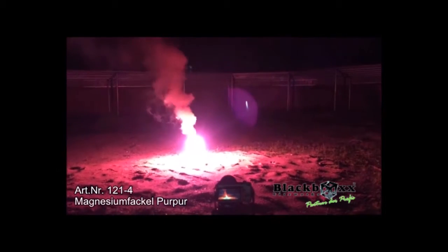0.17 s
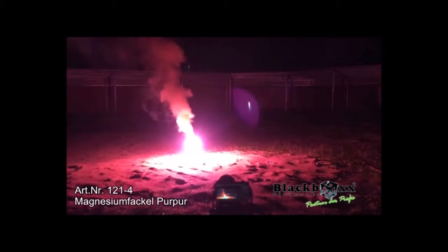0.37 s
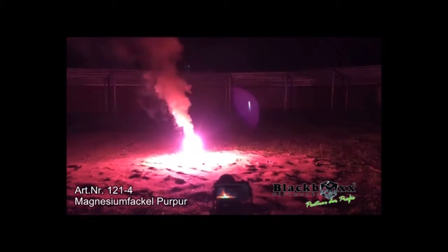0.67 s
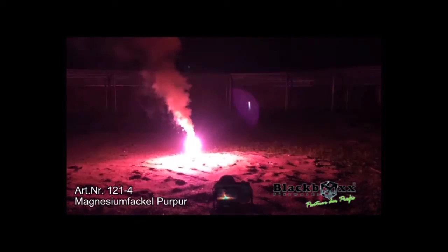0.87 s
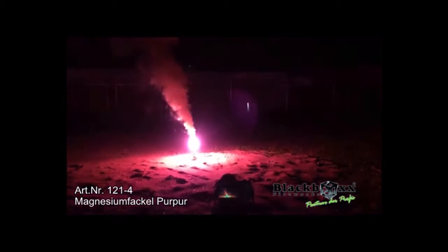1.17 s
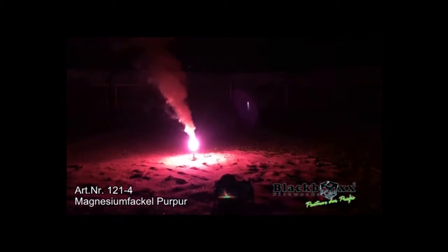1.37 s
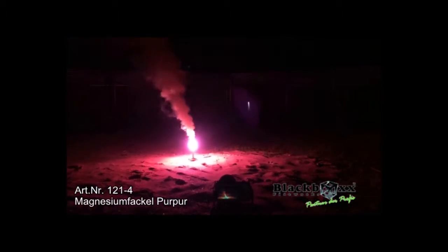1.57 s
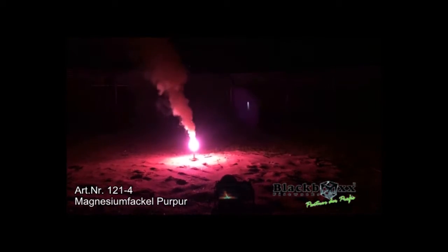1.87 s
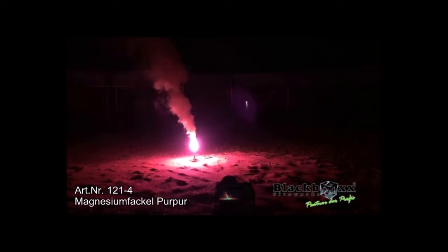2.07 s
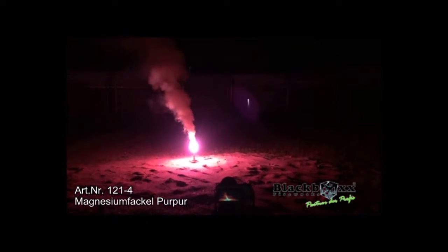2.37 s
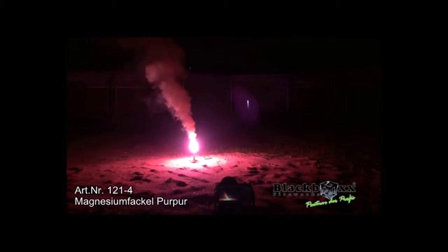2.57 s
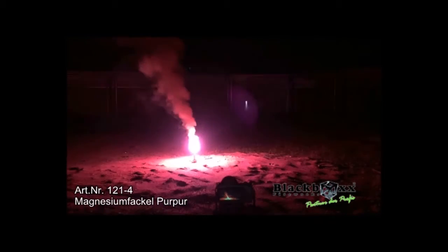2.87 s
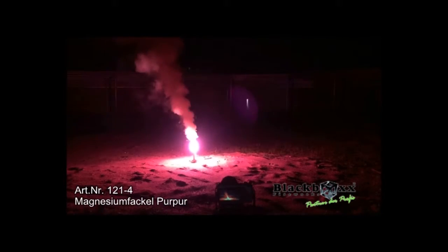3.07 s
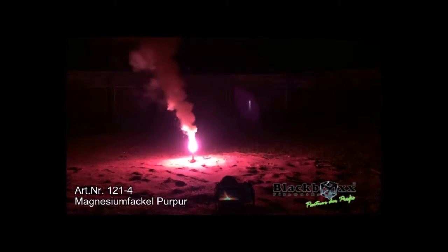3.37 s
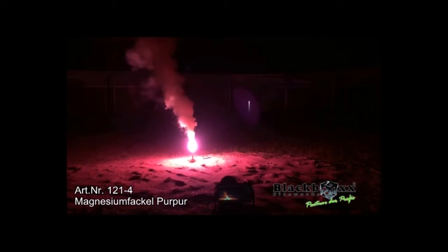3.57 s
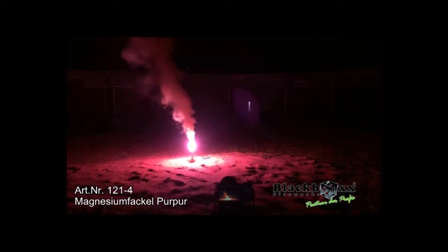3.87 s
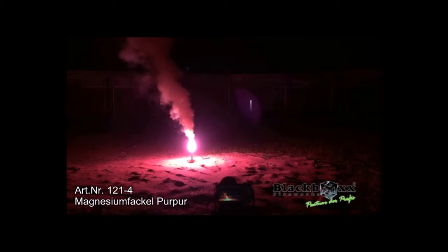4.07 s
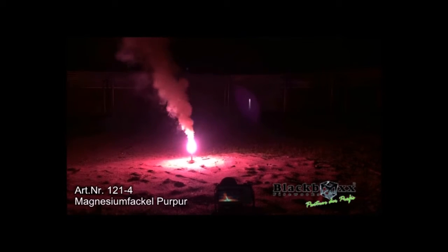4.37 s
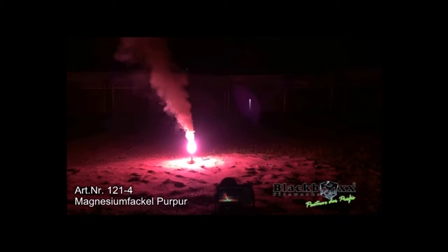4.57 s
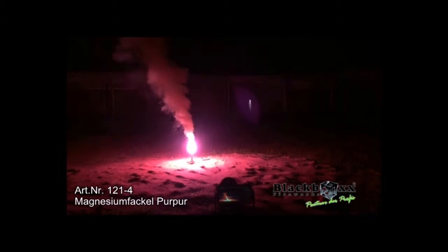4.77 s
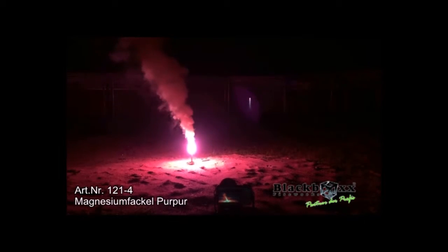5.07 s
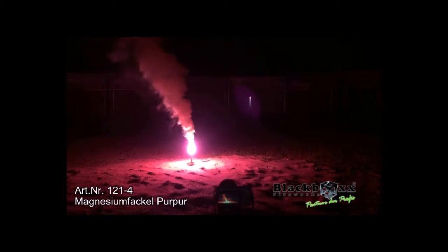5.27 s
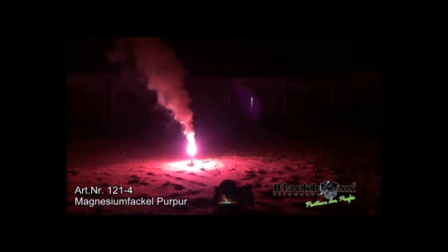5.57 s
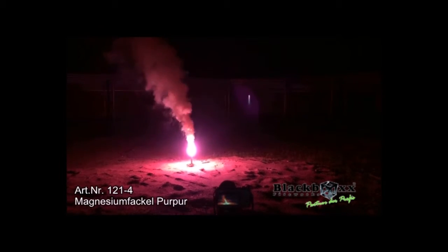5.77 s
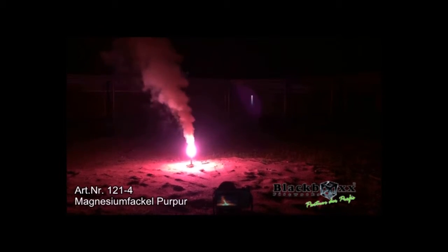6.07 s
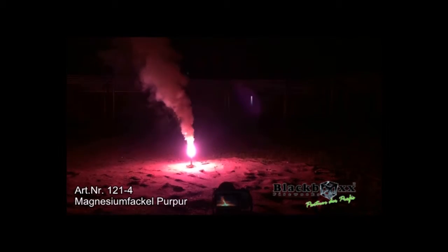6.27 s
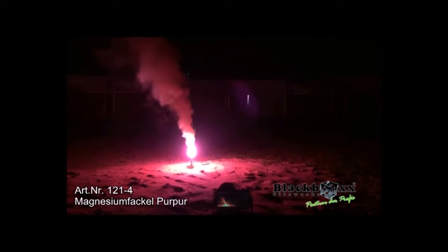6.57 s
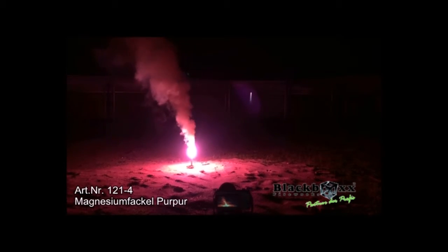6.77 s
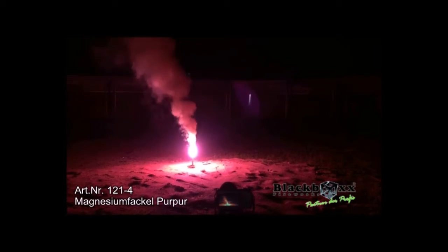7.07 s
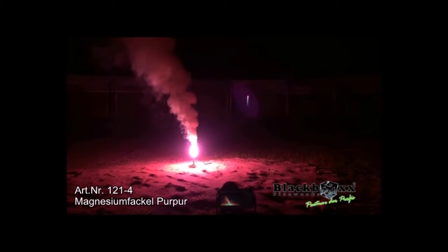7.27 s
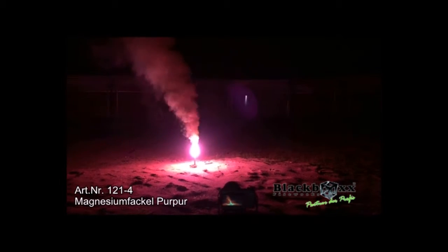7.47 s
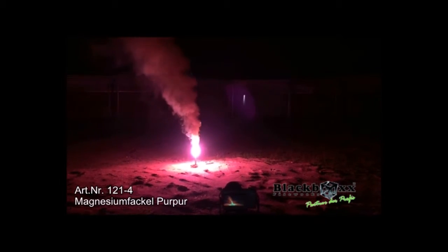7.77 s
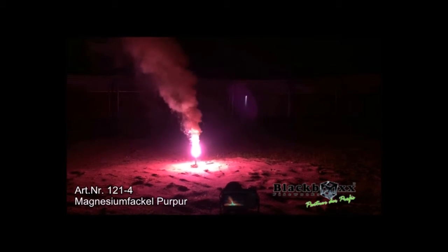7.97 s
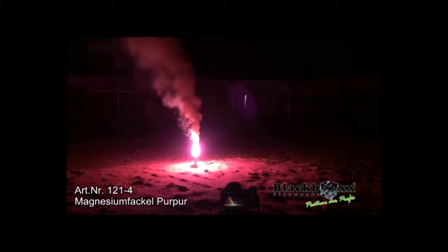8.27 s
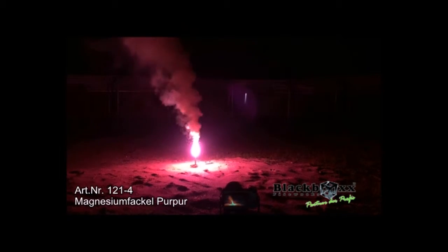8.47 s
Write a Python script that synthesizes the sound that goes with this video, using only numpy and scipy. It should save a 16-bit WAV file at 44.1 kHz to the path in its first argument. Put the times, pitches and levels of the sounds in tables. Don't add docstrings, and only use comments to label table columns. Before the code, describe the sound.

From 0 s a flare stuck in sand is already burning, with a strong continuous jet of bright, breathy hiss. Dense tiny spark clicks give it a fizzing grain, and the top-end sizzle is strongest during the first two seconds. Beneath lies a quieter low flame rumble, rolling in uneven lumps, and a very faint low motor hum. The hissing resonance rises slightly until about 4.5 s. A faint dull pop comes near 2.8 s, a quick cluster of three at 5.0 s as the flame swells, and another at 6.1 s. The rumble caves in briefly around 6.7 s and swells again near 7.6 s. The resonance gradually sinks and the hiss continues to the cut at 8.6 s. Sand reflects closely, fence panels add a faint slap about a tenth of a second late; the sound is centred, with slightly gritty, limited treble.

```python
import sys
import numpy as np
from scipy import signal
from scipy.fft import rfft, irfft, next_fast_len
from scipy.io import wavfile
from scipy.ndimage import uniform_filter1d, minimum_filter1d

SR = 44100
rng = np.random.default_rng(int(sys.argv[2]) if len(sys.argv) > 2 else 0)


def master(y):
    cut = np.clip(np.atleast_2d(y).T, -1, 1)
    pcm = np.round(cut * 32767)
    wavfile.write(sys.argv[1], SR, pcm.astype(np.int16))


def amplitude_ratio(level_db):
    exponent = np.asarray(level_db, float) / 20
    return 10 ** exponent


N = 381024


def rms_one(x):
    return x / np.sqrt(np.mean(x ** 2) + 1e-20)


def in_time(rows):
    s, *columns = np.transpose(rows)
    return [np.interp(np.arange(N) / SR, s, column) for column in columns]


def at_hz(points, hz):
    point_hz, point_db = np.transpose(points)
    return np.interp(np.log(hz), np.log(point_hz), point_db)


def drift(rate_hz):
    r = np.exp(-2 * np.pi * rate_hz * 40 / SR)
    noise = rng.standard_normal(N // 40 + 2002)
    slow = signal.lfilter([1], [1, -2 * r, r * r], noise)[2000:]
    return np.interp(np.arange(N) / 40, np.arange(len(slow)), rms_one(slow))


def filtered(x, response):
    size = next_fast_len(N + SR // 2)
    hz = np.maximum(np.arange(size // 2 + 1) * SR / size, 1)
    return irfft(rfft(x, size) * response(hz), size)[:N]


def bands(spectrum, low_hz, high_hz, count):
    size = next_fast_len(N, True)
    hz = np.maximum(np.arange(size // 2 + 1) * SR / size, 1)
    noise = rfft(rng.standard_normal(size)) * amplitude_ratio(at_hz(spectrum, hz))
    place = np.log(hz / low_hz) / np.log(high_hz / low_hz) * (count - 1)
    place = np.clip(place, 0, count - 1)
    for k, centre_hz in enumerate(np.geomspace(low_hz, high_hz, count)):
        crossfade = np.maximum(1 - np.abs(place - k), 0)
        yield centre_hz, irfft(noise * crossfade, size)[:N]


# frequency in Hz, rms level in dB.
MOTOR = [(98.5, -59.5), (197, -67.5)]


def hum():
    turns = np.cumsum(1 + 0.003 * drift(0.53)) / SR
    tone = 0
    for hz, db in MOTOR:
        tone = tone + np.sqrt(2) * amplitude_ratio(db + 2.3 * drift(2.5)) * np.sin(2 * np.pi * hz * turns)
    return tone


# start in seconds, peak level in dB.
POPS = [
    (2.768, -49),
    (5.005, -48),
    (5.022, -44),
    (5.044, -44),
    (6.066, -46),
]


def pops():
    decay_s = 0.007
    envelope = np.zeros(N)
    for s, db in POPS:
        envelope[round(s * SR)] = amplitude_ratio(db)
    envelope = signal.lfilter([1], [1, -np.exp(-1 / (decay_s * SR))], envelope + 1e-18)

    def dulling(hz):
        low_cut = (hz / 150) / np.sqrt(1 + (hz / 150) ** 2)
        return low_cut / (1 + (hz / 800) ** 3)

    return envelope * rms_one(filtered(rng.standard_normal(N), dulling))


def sparks():
    sparks_per_s, level_db = 600, -54
    sizes = amplitude_ratio(5.0 * np.minimum(rng.exponential(1, N), 4))
    signs = rng.choice([-1, 1], N)
    clicks = sizes * signs * (rng.random(N) < sparks_per_s / SR)
    return amplitude_ratio(level_db) * rms_one(filtered(clicks, lambda hz: amplitude_ratio(at_hz(JET, hz))))


# centre in seconds, change in dB, length in seconds.
SWELLS = [(0.14, 4, 0.073), (0.604, 7, 0.05), (1.16, -4, 0.079), (1.4, 0, 0.083), (2.3, 1.5, .1),
          (2.62, 6, .05), (2.856, 2.5, 0.14), (3.3, -4, 0.098), (3.59, -5, 0.088), (4.025, 5, .1),
          (5.025, 6, 0.18), (5.253, -4, 0.21), (5.72, 4, .05), (5.95, 6, 0.055), (6.19, 5, 0.044),
          (6.716, -9, .06), (7.595, 6, 0.071), (8.29, 1, .08)]


def swells():
    t = np.arange(N) / SR
    return sum(db * np.exp(-0.5 * ((t - s) / (0.5 * length_s)) ** 2) for s, db, length_s in SWELLS)


# frequency in Hz, density in dB per Hz.
RUMBLE = [(20, -37), (50, -3), (85, -1.5), (110, 2.5), (191, -2.5), (343, -14.5), (420, -14.5), (600, -40)]


def rumble(burn_db, swell_db):
    level_db = -50.5 + 0.65 * (burn_db - burn_db.mean())
    deep_hz = 110
    gusts_db = 0.7 * drift(14)
    lumps = 0
    for hz, band in bands(RUMBLE, 44, 290, count=6):
        band_swell_db = swell_db / (1 + (deep_hz / hz) ** 2)
        lumps = lumps + band * amplitude_ratio(gusts_db + band_swell_db + 2.6 * drift(27))
    return amplitude_ratio(level_db) * rms_one(lumps)


# time in seconds, hiss level in dB.
BURN = [(0.0, -37.5), (0.31, -39), (0.67, -38.5), (1.47, -39), (2.02, -38), (3.68, -39), (4.76, -39),
        (4.93, -38), (8.04, -38), (8.08, -39), (8.64, -39)]
BURN_HZ = [2950, 5000, 7540, 11500]
SINK_DB_PER_S = [0.24, 0.2, 0.36, -1.15, -0.02]
FRESH_DB = [1.1, 0, -2.5, -1, 4.5]
# time in seconds, frequency in Hz.
MOUTH = [(0, 5000), (2, 5200), (4.5, 5570), (5.5, 5000), (7, 4700), (8.64, 4200)]
# frequency in Hz, density in dB per Hz.
JET = [(250, -12), (420, -9), (640, -4), (820, -9), (1050, -7), (1500, -7.5), (1850, -5), (2300, -2),
       (3200, 0.5), (4300, 2.5), (6000, 0), (7500, -0.5), (10000, -2), (15300, -8)]


def jet(burn_db, swell_db):
    fresh_s, mouth_width_hz, mouth_boost_db = 2.4, 2700, 6
    mouth_hz, = in_time(MOUTH)
    t = np.arange(N) / SR
    fresh = np.exp(-(t / fresh_s) ** 2)
    curves_db = burn_db + np.outer(SINK_DB_PER_S, t) + np.outer(FRESH_DB, fresh)
    curves_db[0] += 0.25 * swell_db + 0.6 * drift(16)
    curves_db = curves_db - curves_db.mean(axis=1, keepdims=True)
    places = np.log([700.0] + BURN_HZ)
    sputter_db = 0.22 * drift(4.9) + 0.3 * drift(16) + 0.18 * drift(45) + 0.29 * drift(320)
    hiss = 0
    for hz, band in bands(JET, 296, 14470, count=22):
        share = [np.interp(np.log(hz), places, corner) for corner in np.eye(len(places))]
        mouth_db = mouth_boost_db / (1 + (2 * (hz - mouth_hz) / mouth_width_hz) ** 2)
        in_step = np.clip(np.log(hz / 600) / np.log(6.0), 0, 1)
        flicker_db = 0.77 * drift(30)
        hiss = hiss + band * amplitude_ratio(share @ curves_db + mouth_db + in_step * sputter_db + flicker_db)
    return amplitude_ratio(-38.5) * rms_one(hiss)


# delay in seconds, level in dB, dulling corner in Hz.
FENCE = [(.0331, -26, 2500), (.0446, -28, 9000), (.0887, -30, 9000), (.0959, -26, 4000),
         (.1115, -24, 18000), (.11449, -13, 2400), (.1221, -17.5, 7000), (.1945, -24, 2500)]
# delay in seconds, share of the direct sound.
NEARBY = [(.0007, .08), (.0012, .05), (.00172, .04), (.002, .06), (.00228, .05), (.0054, .03)]


def paths(hz):
    sand_s, sand_share, sand_cut_hz = 0.000336, 0.43, 1980

    def delayed(s):
        return np.exp(-2j * np.pi * hz * s)

    sand = sand_share * delayed(sand_s) / (1 + 1j * hz / sand_cut_hz)
    fence = sum(amplitude_ratio(db) * delayed(s) / (1 + 1j * hz / dull_hz) ** 2 for s, db, dull_hz in FENCE)
    nearby = sum(share * delayed(s) for s, share in NEARBY)
    return (1 + sand) * (1 + nearby) + fence


def scene():
    swell_db = swells()
    burn_db, = in_time(BURN)
    flare = filtered(jet(burn_db, swell_db) + sparks(), paths)
    mono = flare + pops() + rumble(burn_db, swell_db) + hum()
    return np.array([mono, mono])


# centre in Hz, width in Hz, gain in dB.
DIPS_AND_PEAKS = [(1320, 170, -7), (1720, 200, -3), (3300, 120, -2), (3750, 200, -3.5), (4150, 200, -1.5),
                  (6380, 150, -6), (6800, 120, -2), (7400, 300, -1.5), (9200, 220, -3), (10300, 300, -2),
                  (13400, 250, -1.5), (14250, 200, 1.0),
                  (2243, 520, 5.5), (8150, 280, 2), (13150, 750, 6.5), (13750, 300, 2.5), (14800, 300, 6),
                   (15250, 200, 1.5)]


def colouring(hz):
    low_cut_hz = 38
    colour_db = 0
    for centre_hz, width_hz, db in DIPS_AND_PEAKS:
        colour_db = colour_db + db / (1 + (2 * (hz - centre_hz) / width_hz) ** 2)
    return amplitude_ratio(colour_db) / np.sqrt(1 + (low_cut_hz / hz) ** 6)


def starve(x):
    top_hz, dead_db = 15310, -5.5
    hz, _, cells = signal.stft(x, SR, nperseg=2048, noverlap=1536)
    row_hz = hz[:, None]
    power = np.abs(cells) ** 2
    steady = uniform_filter1d(power, size=60, axis=1)
    alive = power > uniform_filter1d(steady, size=9, axis=0) * amplitude_ratio(2 * dead_db) * (row_hz > 300)
    near = uniform_filter1d(uniform_filter1d(power, size=4, axis=0), size=5, axis=1)
    limit_db = -8.3 + 5.2 * np.log2(np.maximum(row_hz, 1) / 8000)
    limit_db = limit_db - 40 * (row_hz < 3000)
    kept = near > uniform_filter1d(steady, size=90, axis=0) * amplitude_ratio(2 * limit_db)
    kept = minimum_filter1d(kept * 1.0, size=3, axis=0)
    gated = cells * alive * (row_hz < top_hz) * (0.05 + 0.95 * kept)
    return signal.istft(gated, SR, nperseg=2048, noverlap=1536)[1][:N]


def band_limit(x):
    return signal.sosfilt(signal.butter(12, 15400, fs=SR, output="sos"), x)


def record(dry):
    mono = starve(filtered(dry[0], colouring))
    return band_limit(np.array([mono, mono]))


dry = scene()
out = record(dry)
master(out)
```